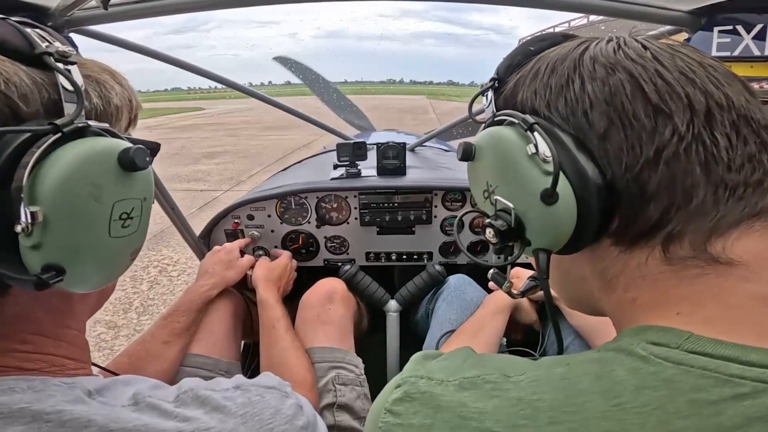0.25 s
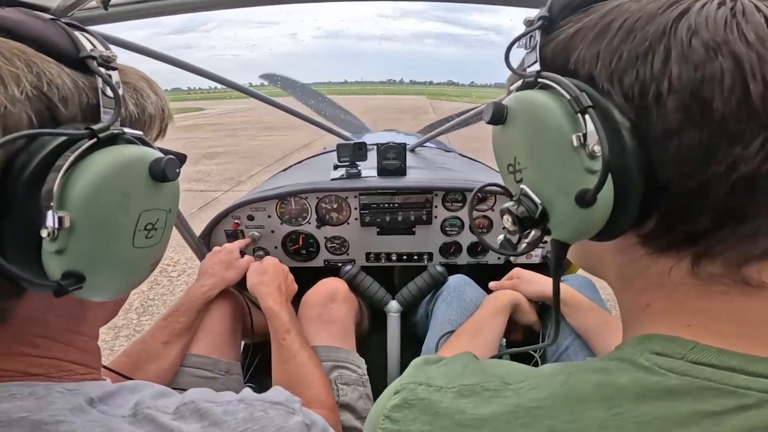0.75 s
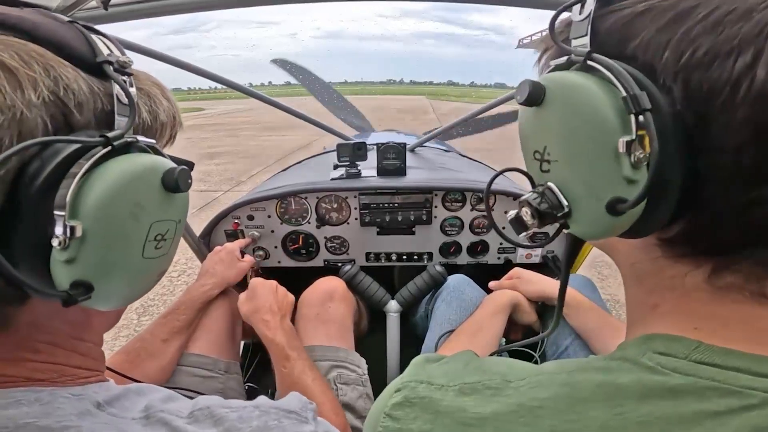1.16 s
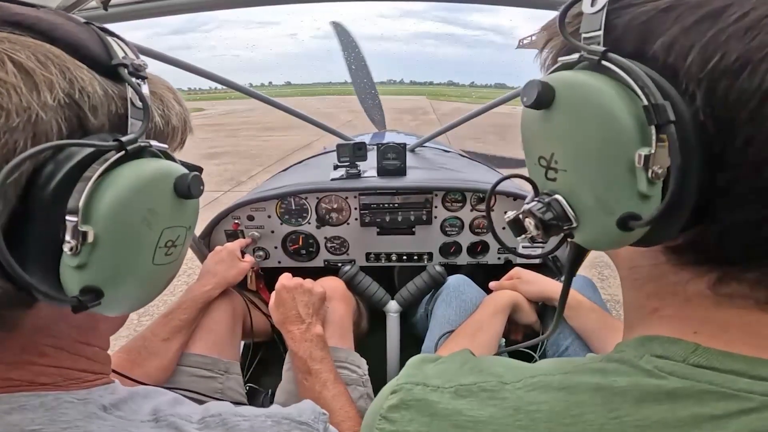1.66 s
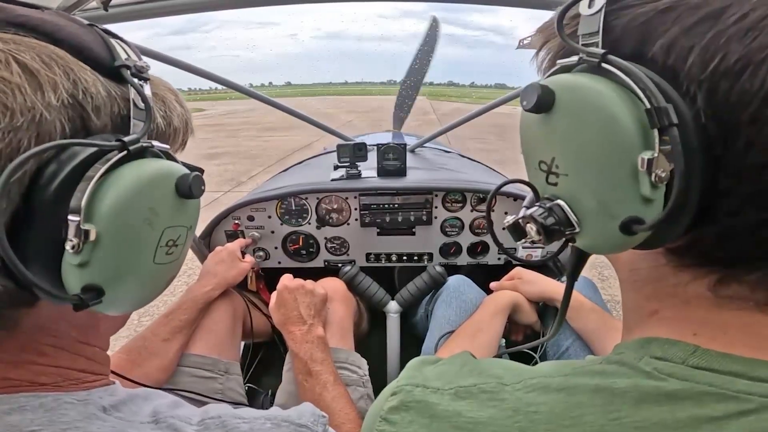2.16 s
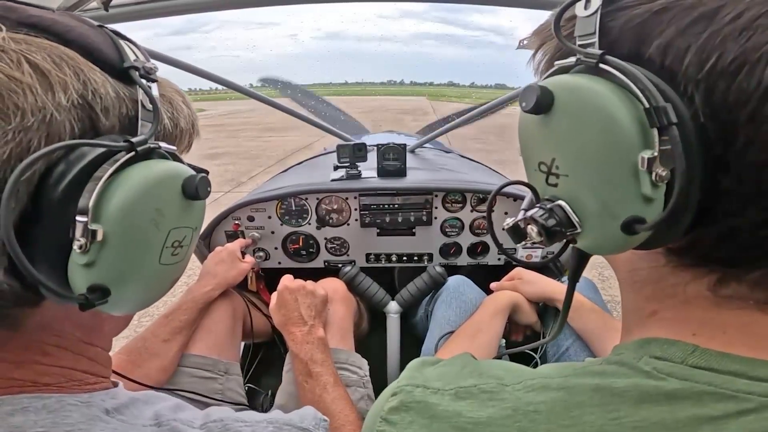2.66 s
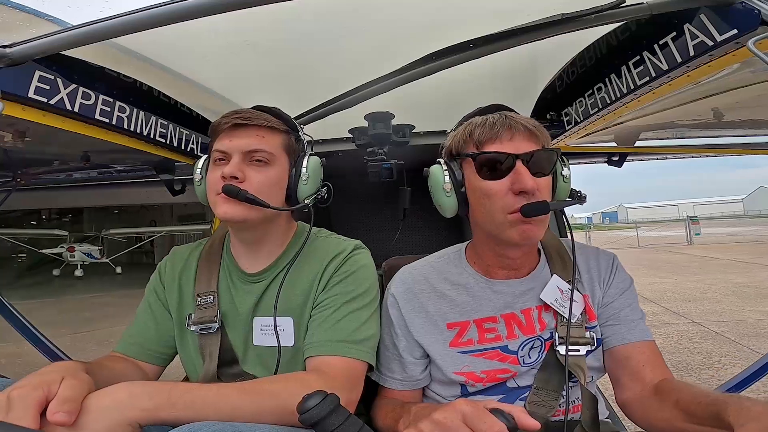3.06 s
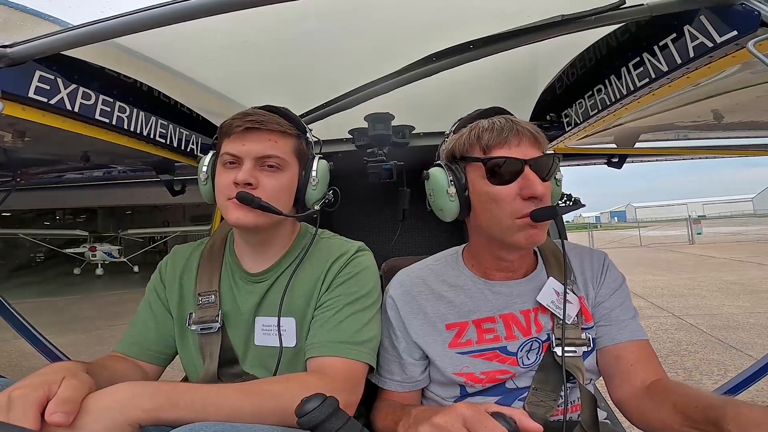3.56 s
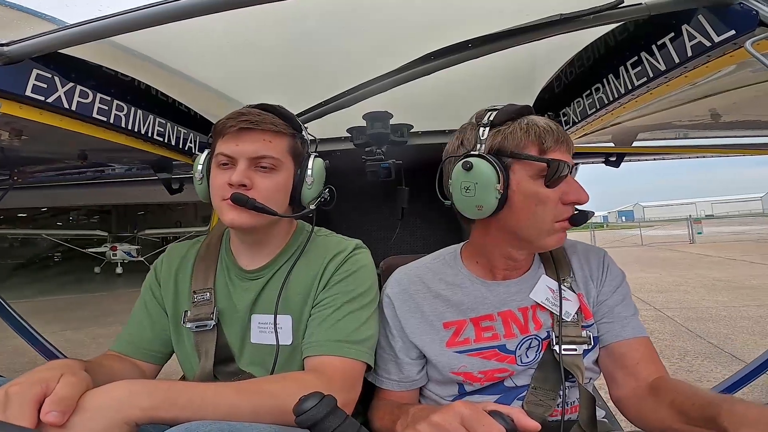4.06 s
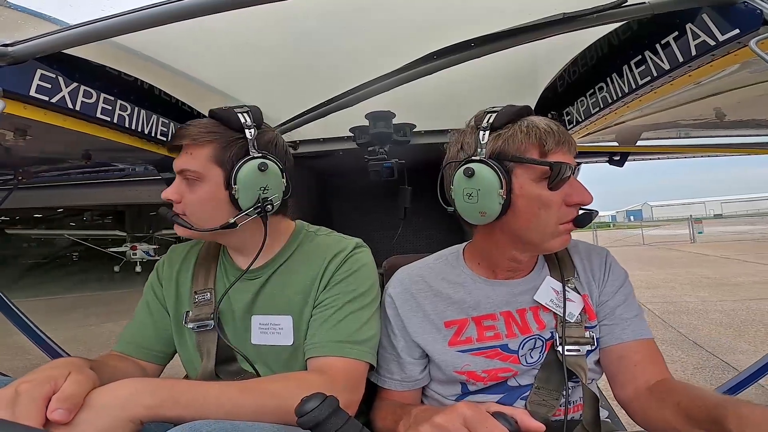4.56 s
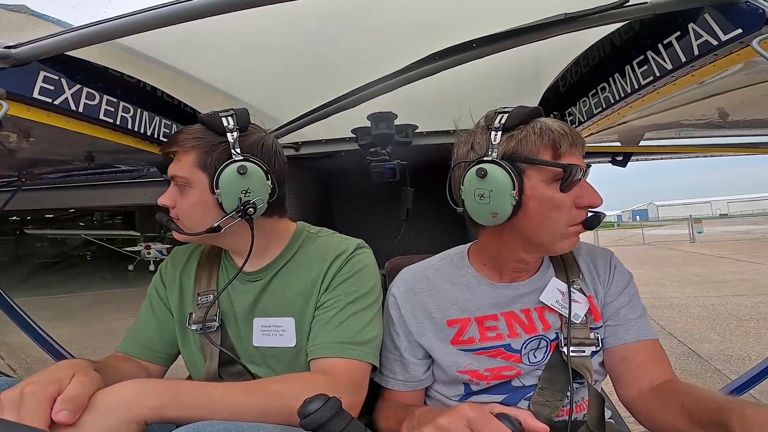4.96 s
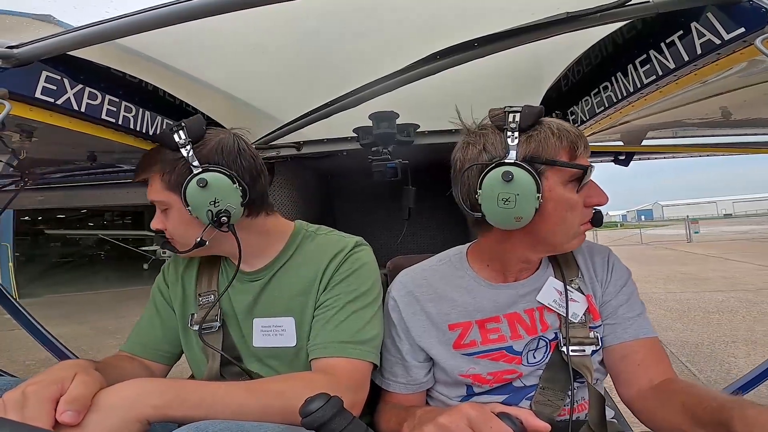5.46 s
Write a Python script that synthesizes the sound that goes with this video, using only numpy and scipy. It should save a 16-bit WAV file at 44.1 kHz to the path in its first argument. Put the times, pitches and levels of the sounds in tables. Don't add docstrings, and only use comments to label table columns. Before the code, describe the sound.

A small aircraft engine catches and speeds up with a loud rattling cabin roar, then cuts abruptly to a quieter, muffled, throbbing drone.

```python
import sys
import numpy as np
from scipy import signal
from scipy.fft import rfft, irfft, next_fast_len
from scipy.io import wavfile
from scipy.ndimage import uniform_filter1d, map_coordinates

SR = 44100
rng = np.random.default_rng(int(sys.argv[2]) if len(sys.argv) > 2 else 0)


def log_audio(samples):
    frames = np.atleast_2d(samples).T
    limited = np.clip(frames, -1, 1)
    pcm = np.round(limited * 32767).astype(np.int16)
    wavfile.write(sys.argv[1], SR, pcm)


def level_to_linear(level):
    exponent = np.asarray(level, float) / 20
    return 10 ** exponent


N = 251370
SWITCH_S = 2.82653
BLADE_ORDER = 3 / 2 / 2.43
LEFT_RIGHT = np.array([[1], [-1]])


def in_time(rows, t):
    s, *columns = np.transpose(rows)
    return [np.interp(t, s, column) for column in columns]


def at_hz(points, hz, axis=1):
    return np.interp(np.log(hz), np.log(np.array(points)[:, 0]), np.array(points)[:, axis])


def resonance(hz, centre, width, lift_db):
    return lift_db / (1 + (2 * (hz - centre) / width) ** 2)


def drift(t, per_s):
    knots = rng.standard_normal(400)
    return map_coordinates(knots, [(t - t[0]) * np.clip(per_s, .1, 130)], order=3)


def ring(clicks, hz, t60):
    r, w = level_to_linear(-60 / (t60 * SR)), 2 * np.pi * hz / SR
    return signal.lfilter([0, np.sin(w)], [1, -2 * r * np.cos(w), r * r], clicks + 1e-18)


def turns(hz):
    phase = 2 * np.pi * np.cumsum(hz) / SR
    return phase - phase[-1]


def to_sample(seconds, t):
    return (seconds * SR).astype(int).clip(0, len(t) - 1)


def engine_tones(t, firing, orders, levels_db, waver_db):
    out = 0
    for order, db in zip(orders, levels_db):
        out = out + np.sqrt(2) * level_to_linear(db + waver_db * drift(t, 14)) * np.cos(order * firing)
    return out


def upper_orders(t, firing, orders):
    return sum(level_to_linear(db + 4.5 * drift(t, 4.96)) * np.sin(k * firing + k * k) for k, db in orders)


# multiple of firing, level in dB away from cabin modes, change in dB per Hz of firing.
REAR_LINES = [(2 / 2, -28, 0.01), (2, -29, 0.088), (5 / 2, -35, -0.12), (3 / 4, -39, 1.2), (4, -45.5, 0.01),
              (5, -44.5, 0.01), (6, -45.5, 0.01), (13 / 2, -49, -0.27), (15 / 2, -44.5, 0.01),
              (2 / 4, -48, 0.8), (3, -47, -0.37)]
# Hz, width in Hz, lift in dB.
CABIN_MODES = [(49, 7.7, 7.5), (57.6, 4, -4), (86.8, 5.2, 3.5), (92.7, 2.8, -14), (112, 13, 4.5),
               (223, 13, 6), (273.3, 12, 9.5), (306.5, 20, 8.5)]
# multiple of firing, level in dB.
REAR_ORDERS = [(3 / 2, -34), (3.4, -37.5), (4, -43.5), (9 / 2, -36), (4.4, -48)]


def rear_tones(t, hz, firing):
    levels_db = []
    for order, db, slope in REAR_LINES:
        cabin_db = sum(resonance(order * hz, *mode) for mode in CABIN_MODES)
        levels_db.append(db + slope * (hz - hz.mean()) + cabin_db)
    steady = engine_tones(t, firing, [row[0] for row in REAR_LINES], levels_db, waver_db=1.14)
    return steady + upper_orders(t, firing, REAR_ORDERS)


# time in seconds, level in dB.
CATCH = [
    (0, -39),
    (.06, -26),
    (.22, -30.5),
    (.3, -68),
]


def catch_boom(t):
    return level_to_linear(in_time(CATCH, t)[0] + 6) * np.sin(2 * np.pi * 131.5 * t) * (t < CATCH[-1][0])


# multiple of firing, level in dB.
PANEL_ORDERS = [(3 / 2, -52.5), (1.8, -42.5), (5 / 2, -47), (4.3, -47.5), (7 / 2, -41.5), (2.9, -47.5),
                (5.9, -49.5), (6, -47.5)]


def panel_tones(t, firing, firing_db, faster):
    levels_db = [firing_db, -59.5 + 1 * faster, -44.5]
    tones = engine_tones(t, firing, [1, BLADE_ORDER, 4 * BLADE_ORDER], levels_db, waver_db=2.1)
    mount = level_to_linear(-54 - 1 * faster) * np.sin(firing) * LEFT_RIGHT
    return tones + upper_orders(t, firing, PANEL_ORDERS) + mount


def pops(t, rows, gain_db, cycles):
    out = np.zeros(len(t))
    age = np.arange(int(.1 * SR)) / SR
    for s, db, hz in rows:
        at = int((s - t[0]) * SR)
        height = level_to_linear(db + gain_db - 60 * age * hz / cycles)
        soft_start = 1 - np.exp(-age * hz * 1.9)
        wave = height * np.sin(2 * np.pi * hz * age) * soft_start
        out[at:at + len(age)] += wave[:len(t) - at]
    return out


SLAP_HZ = [122, 487]


def blade_slaps(blade):
    passes = np.flatnonzero(np.diff(np.floor(blade / (2 * np.pi))))
    chance = rng.standard_normal((200, 2))[:len(passes)]
    at = (passes + .0012 * SR * chance[:, 0]).astype(int).clip(0, len(blade) - 1)
    pushes = np.zeros(len(blade))
    pushes[at] = level_to_linear(-13.5 + 2 * chance[:, 1])
    band = signal.butter(2, SLAP_HZ, "band", fs=SR, output="sos")
    return signal.sosfilt(band, pushes) * SR / (2 * np.pi * SLAP_HZ[1])


# start in seconds, peak in dB, pitch in Hz.
KNOCKS = [(2.861, -28, 1080), (3.085, -21.5, 1080), (3.123, -22, 950), (3.183, -24, 1190),
          (3.451, -25, 1070), (3.499, -25.5, 1080), (4.022, -37, 1080), (4.540, -19, 644),
          (4.542, -30, 1110), (5.572, -31, 1000), (4.628, -24, 900), (4.698, -20, 1090), (4.718, -25, 1190),
          (4.83, -21, 600), (4.855, -27, 1150), (5.037, -26.5, 1120), (5.370, -23, 630), (5.415, -24, 1120),
          (5.640, -21.5, 650)]
# start in seconds, peak in dB, pitch in Hz.
PANEL_TAPS = [(2.941, -19, 635), (3.04, -20, 646), (3.225, -27, 888), (3.306, -22, 1060), (3.351, -22, 665),
              (3.371, -23, 622), (3.403, -21, 767), (3.472, -25, 1160), (3.602, -31, 600),
              (3.706, -24, 673), (3.764, -30, 1200), (3.865, -29, 662), (3.892, -33, 620),
              (4.234, -28, 665), (4.478, -33, 778), (4.519, -32, 1080), (4.677, -22, 764), (4.74, -35, 746),
              (4.975, -24, 705), (5.086, -28, 640), (5.189, -26, 630), (5.392, -22, 626), (5.528, -24, 760),
              (5.617, -30, 630)]


def airframe_knocks(t):
    out = np.zeros(len(t))
    for s, db, hz in [*KNOCKS, *[(s, db - 2, hz) for s, db, hz in PANEL_TAPS]]:
        click = level_to_linear(db - 4.0) * (np.arange(len(t)) == int((s - t[0]) * SR))
        out += ring(click, hz, 0.031)
        out += 0.6 * ring(click, 1.6 * hz, 0.011)
        out += 0.081 * ring(click, 2.2 * hz, 0.0071)
    return out


CRACK_HZ = [1900, 13370]


def crack(clicks):
    burst = rng.standard_normal(400) * np.exp(-np.arange(400) / SR / 0.0014)
    snaps = signal.fftconvolve(clicks, burst[None], axes=1)[:, :clicks.shape[1]]
    band = signal.butter(4, CRACK_HZ, "band", fs=SR, output="sos")
    return level_to_linear(3.5) * signal.sosfilt(band, snaps)


# start in seconds, peak in dB, centre in Hz.
LATCH_RATTLES = [(0.0198, -22, 2110), (0.037, -18, 2160), (0.0674, -16.5, 2100), (0.091, -17.5, 2160),
                 (0.111, -25, 2300), (.134, -25, 2920), (.162, -16.5, 2120), (0.1868, -21, 2160),
                 (.261, -30, 2890), (.3222, -35, 2510), (0.342, -21.5, 2070), (0.3887, -22, 2900),
                 (.427, -25, 2170), (0.449, -26.5, 2110), (0.489, -24.5, 2110), (0.5163, -25, 2830),
                 (0.539, -27, 2100), (0.5692, -24.5, 2070), (0.646, -27, 2120), (0.6717, -22.5, 2140),
                 (0.693, -24, 2610), (0.7427, -22, 2560), (0.7864, -20.5, 2630), (0.8293, -30, 2230),
                 (0.8587, -22.5, 2500), (.9244, -30, 2940), (0.9685, -25.5, 2090), (2.138, -20, 2100),
                 (2.4055, -23, 2170), (2.677, -21, 2690)]
# start in seconds, peak in dB, centre in Hz.
AHEAD_RATTLES = [(.0003, -11.5, 4550), (0.0212, -13, 4460), (0.083, -31, 3830), (0.174, -19, 3150),
                 (0.756, -24, 4500), (1.057, -23.5, 3170), (1.148, -28, 3240), (1.2354, -23, 3060),
                 (1.385, -21.5, 2110), (1.4136, -20.5, 2260), (1.503, -26, 3130), (1.5464, -27, 2160),
                 (1.6117, -30, 2280), (1.677, -19, 2120), (1.7617, -21, 4940), (1.782, -19.5, 2080),
                 (1.94, -20, 2080), (2.0522, -24, 2170), (2.0962, -19.5, 4000), (2.177, -23.5, 3780),
                 (2.2097, -22, 3030), (2.256, -21, 3890), (2.3124, -25, 3110), (2.334, -21.5, 4000),
                 (2.3524, -17, 2110), (2.392, -24, 3130), (2.43, -23, 4070), (2.483, -26, 3130),
                 (2.556, -26, 4550), (2.61, -34, 3130), (2.6265, -23, 3930)]
# start in seconds, peak in dB, centre in Hz.
FAINT_RATTLES = [(0.052, -22, 2150), (0.101, -22, 2150), (0.123, -25, 2150), (0.146, -31, 3900),
                 (0.2204, -32, 2100), (0.3564, -23, 2000), (0.433, -31, 2090), (0.4714, -32, 2200),
                 (0.5014, -30.5, 2170), (0.547, -29, 2860), (0.6014, -27, 2110), (0.6325, -29, 2140),
                 (0.7166, -27, 2650), (0.7616, -26, 2140), (0.7964, -27, 2200), (0.8714, -22, 2060),
                 (0.9824, -30, 2090), (1.1223, -40, 3140), (1.479, -31, 2080), (1.656, -31, 3110),
                 (1.8097, -28, 2660), (1.8694, -37, 2120), (1.9915, -35, 2060), (2.193, -26, 3900),
                 (2.417, -28, 3900), (2.568, -34, 3900), (2.0672, -29, 2600), (2.113, -25, 2150),
                 (2.271, -24.5, 2130), (2.376, -39, 2090), (2.4464, -27.5, 2110), (2.525, -32.5, 3100),
                 (2.581, -26, 2660), (2.698, -27, 2160), (0.306, -40, 2090), (0.4976, -31, 2900),
                 (1.299, -32, 2100), (2.7235, -23, 2110), (2.7747, -27, 3870)]
# Hz, level in dB, seconds to fall by 60 dB.
FITTINGS = [(2160, -6.5, 0.024), (2500, -14.5, 0.034), (2560, -21, 0.15), (2800, -3, 0.013),
            (3110, -2.5, 0.0075), (3430, -2.5, 0.0074), (3930, -3, 0.016), (4460, -7.5, 0.023),
            (4830, -10, 0.029), (5500, -8, 0.0075), (6200, -12.5, 0.017), (6720, -8.5, 0.0066),
            (6880, -17, 0.014), (7640, -10.5, 0.017), (8260, -18, 0.014)]
# Hz, left minus right in dB.
FITTING_LEAN = [(2100, 5.5), (2900, 4), (3900, -0.5), (4500, 3), (5600, -12), (6800, -1), (7600, -4),
                (8300, 2)]


def rattles(t, cycle, shake_db):
    # left minus right in dB, brightness of the upper modes in dB
    rows = [(*row, 13, -12) for row in LATCH_RATTLES]
    rows += [(*row, 0.5, -15) for row in AHEAD_RATTLES]
    rows += [(s, db + 2.5, hz, 4, -16.5) for s, db, hz in FAINT_RATTLES]
    start, peak_db, centre, pan_db, bright_db = np.array(rows).T
    chance = rng.standard_normal((len(rows), len(FITTINGS) + 1, 8, 3))

    gaps = np.abs(chance[:, -1, :, 0]) * 0.0028 * (np.arange(8) > 0)
    late = np.cumsum(gaps, axis=1)
    at = to_sample(start[:, None] + late, t)
    fading = level_to_linear(-650 * late + 2 * (late == 0))

    crowd = 220 * np.exp(1.4 * np.cos(cycle) + 0.57 * np.cos(4 * cycle) + 0.57 * drift(t, 13))
    small_db = 3.1 * np.minimum(rng.exponential(1, len(t)), 3.5) + shake_db - 5.0
    small = (rng.random(len(t)) < crowd / SR) * level_to_linear(small_db)

    out = np.zeros((2, len(t)))
    for k, (hz, level_db, t60) in enumerate(FITTINGS):
        alike = .85 if hz < 5200 else .1
        apart = np.sqrt(1 - alike ** 2)
        shared, left, right = rng.standard_normal((3, len(t)))
        clicks = small * (alike * shared + apart * np.array([left, right]))
        near_db = -10 * np.abs(np.log2(hz / centre)) if hz < 5200 else bright_db + 6
        common = (np.sign(chance[:, k, :, 2]) + 0.25 * chance[:, k, :, 2]) * 0.7
        for channel, sign in enumerate([1, -1]):
            size = level_to_linear(peak_db + near_db + sign * pan_db / 2 - 11.0)[:, None] * fading
            np.add.at(clicks[channel], at, size * (alike * common + apart * chance[:, k, :, channel]))
        lean = at_hz(FITTING_LEAN, hz) / 2 * LEFT_RIGHT
        out += level_to_linear(level_db + lean) * ring(clicks, hz, t60)
    clicks[:, at[:, 0]] += level_to_linear(peak_db - 19 + pan_db / 2 * LEFT_RIGHT)
    return out + level_to_linear(-21.5) * crack(clicks)


# start in seconds, peak in dB.
BUZZES = [(0.0385, -33), (0.0777, -35), (0.175, -37), (0.2204, -50), (0.2613, -44), (0.2872, -49),
          (0.3222, -50), (0.3416, -39), (0.3815, -48), (0.394, -47.5), (0.4274, -45.5), (0.4718, -53),
          (0.5212, -41), (0.634, -50), (0.6729, -48), (0.6913, -40), (0.7552, -36), (0.7861, -46),
          (0.8425, -52), (0.8584, -50), (0.9118, -49), (0.9273, -46), (0.9695, -39), (1.0126, -55),
          (1.1568, -59), (1.385, -42), (1.4152, -48), (1.4855, -57), (1.505, -52), (1.5943, -50),
          (1.6392, -55), (1.6766, -53), (1.7235, -54), (1.7674, -50), (1.8093, -51), (1.8522, -49),
          (2.0527, -52), (2.0647, -51), (2.1026, -47), (2.1405, -49), (2.1844, -50), (2.209, -36),
          (2.2628, -46), (2.3126, -44), (2.3516, -48), (2.3925, -53), (2.4947, -58), (2.6784, -40),
          (2.7222, -47), (2.7741, -47)]
BUZZ_HZ = [6600, 6980]


def buzzes(t):
    rows, out = np.array(BUZZES), 0
    chance = rng.standard_normal((len(rows), 3, 4))
    late = np.cumsum(np.abs(chance[:, 2]) * 0.0022, axis=1)
    at = to_sample(rows[:, :1] + late - .001, t)
    for k, hz in enumerate(BUZZ_HZ):
        clicks = np.zeros(len(t))
        np.add.at(clicks, at, level_to_linear(rows[:, 1:] - 3) * np.sign(chance[:, k]))
        out = out + ring(clicks, hz, t60=0.017)
    return out * level_to_linear(6.5 / 2 * LEFT_RIGHT) * LEFT_RIGHT


def half_octave(hz, centre):
    return np.cos(np.pi * np.clip(np.log2(hz / centre), -.5, .5)) ** 2


ROAR_CENTRES_HZ = [150, 350, 1050, 4000]


def roar(t, levels_db, colour, peaks, likeness, throb, beats, patchy_db):
    size = next_fast_len(len(t))
    hz = np.maximum(np.arange(size // 2 + 1) * SR / size, 1)
    shape_db = at_hz(colour, hz) + sum(resonance(hz, *peak) for peak in peaks)
    mid, side = rfft(rng.standard_normal((2, size))) * level_to_linear(shape_db) * (hz > 12)
    alike = np.clip(at_hz(likeness, hz), -.99, 1)
    pair = np.sqrt(1 + alike) * mid + np.sqrt(1 - alike) * side * LEFT_RIGHT

    boom = (hz > 200) & (hz < 600)
    pair = pair / np.std(irfft(pair[0] * boom, size))
    swing_db = np.array([db - np.mean(db) for db in levels_db]) + np.mean(levels_db[1])

    out, gust = 0, drift(t, 26.01)
    for centre in 10 * 2 ** np.arange(0, 11, .5):
        place = np.interp(np.log(centre), np.log(ROAR_CENTRES_HZ), range(4))
        below = min(int(place), 2)
        level_db = swing_db[below] + (place - below) * (swing_db[below + 1] - swing_db[below])
        pump = sum(at_hz(throb, centre, axis=k + 1) * np.cos(beat) for k, beat in enumerate(beats))
        gust_share = min(centre / 2200, 1.9)
        patches_db = patchy_db * (gust_share * gust + 0.61 * drift(t, 29.84))
        band = irfft(pair * half_octave(hz, centre), size)[:, :len(t)]
        out = out + level_to_linear(level_db + patches_db) * np.exp(pump) * band
    return out


# level in dB, dB per dB of shaking, dB of starting surge, dB per Hz of firing.
REAR_LAW = [(-27, 0.15, 4.5, 0.13), (-28.5, 0.21, 5.5, 0), (-38, 0.8, -4.5, 0.19), (-51, 1.16, 1.4, 0.4654)]
# Hz, level in dB per Hz.
REAR_COLOUR = [(18, -11.5), (48, -6.5), (101, -4), (178, -9), (313, -10.5), (371, -15.5), (600, -19),
               (819, -25), (1290, -28), (3180, -40), (7640, -49.5), (9000, -56), (12800, -64.5),
               (15500, -71.5)]
# Hz, width in Hz, lift in dB.
REAR_PEAKS = [(139.7, 21, 3), (209, 23, 1.5), (256, 18, 4), (315, 12, 3.5), (470, 36, 7), (1090, 260, 4.5),
              (4640, 870, 1.5)]
# Hz, likeness from -1 to 1.
REAR_LIKENESS = [(60, 0.97), (130, 1.0), (290, 0.99), (640, 0.95), (1410, 0.9), (3100, 0.57), (6820, -0.64),
                 (15000, 0.19)]
# Hz, depth by firing, by blade, by full four-stroke cycle.
REAR_THROB = [(101, 0.017, 0.056, 0.03), (980, 0.078, 0.073, 0.032), (4940, 0.037, 0.062, 0.069)]


def rear_air(t, hz, shake_db, beats):
    surge = 1 / (1 + (t / 0.67) ** 5.5)
    shaking, faster = shake_db - shake_db.mean(), hz - hz.mean()
    levels_db = [db + a * shaking + b * surge + c * faster for db, a, b, c in REAR_LAW]
    return roar(t, levels_db, REAR_COLOUR, REAR_PEAKS, REAR_LIKENESS, REAR_THROB, beats, patchy_db=1.5)


# level in dB, dB per Hz of firing.
PANEL_LAW = [(-33, 0.2), (-31.5, 0.25), (-47, 0.15), (-60, 0.33)]
# Hz, level in dB per Hz.
PANEL_COLOUR = [(18, -22), (40, -23), (65, -11), (110, -5.5), (200, 2), (300, -3.5), (450, -7), (650, -15),
                (1200, -17), (2000, -25), (2700, -37), (4500, -42), (5800, -55), (9000, -76)]
# Hz, width in Hz, lift in dB.
PANEL_PEAKS = [(260, 16, 5), (309.4, 33, 5), (642, 9.2, 13), (930, 54, 3.5), (1080, 65, 5.5),
               (1550, 180, 4), (3110, 240, 13), (3830, 100, 9.5), (4020, 110, 6.5), (4575, 330, 10),
               (5080, 250, 5)]
# Hz, likeness from -1 to 1.
PANEL_LIKENESS = [(30, 0.64), (70, 1), (140, 1), (15000, 1)]
# Hz, depth by crank, by blade, by twice the blade rate.
PANEL_THROB = [(100, 0.054, 0.37, 0.03), (400, 0.045, 0.23, 0.081), (2500, 0.095, 0.11, 0.14)]


def panel_air(t, faster, beats):
    levels_db = [db + slope * faster for db, slope in PANEL_LAW]
    return roar(t, levels_db, PANEL_COLOUR, PANEL_PEAKS, PANEL_LIKENESS, PANEL_THROB, beats, patchy_db=0.7)


# Hz, left minus right in dB.
REAR_BALANCE = [(60, 0.5), (110, 0), (200, 0), (380, 0.5), (700, 0.5), (1290, 3), (2380, 2), (4400, 1),
                (8120, -2), (15000, 2)]
# Hz, phase in radians.
REAR_LEAD = [(60, 0), (400, -0.028), (1000, -0.32), (1810, -0.62), (2670, -1.66), (3880, 0.92),
             (5680, -0.75), (15000, -1.0)]


def two_ports(sound, t):
    hz = np.maximum(np.arange(len(t) // 2 + 1) * SR / len(t), 1)
    balance = level_to_linear(at_hz(REAR_BALANCE, hz) / 2 * LEFT_RIGHT)
    lead = np.exp(.5j * at_hz(REAR_LEAD, hz) * LEFT_RIGHT)
    return irfft(rfft(sound) * balance * lead, len(t))


# low edge in Hz, high edge in Hz, rarity (higher is more often off).
RAGGED = [(9000, 9250, -1.3), (9400, 9650, -1.2), (9950, 10200, -1.0), (10400, 10650, -.8),
          (10850, 11100, -.7), (11450, 11700, -.7), (11800, 12050, -.7), (12350, 12600, -.6),
          (12900, 13400, -.2), (13400, 14000, .1), (14000, 14700, .4), (14700, 16500, 1.0)]


def ragged_top(sound, t):
    hz, spectrum = np.arange(len(t) // 2 + 1) * SR / len(t), rfft(sound)
    frame_s = 1024 / 48000
    t = t // frame_s * frame_s
    together = drift(t, 22.0)
    for low_hz, high_hz, rarity in RAGGED:
        off = .55 * together + .85 * drift(t, 32.0) < rarity
        lost = uniform_filter1d(1.0 * off, size=200)
        sound = sound - lost * irfft(spectrum * ((hz >= low_hz) & (hz < high_hz)), len(t))
    return sound


# time in seconds, firing rate in Hz, shaking of the airframe in dB.
REAR_ENGINE = [(0.0, 30.9, -35.5), (.07, 33.05, -41), (.18, 34.12, -45.5), (.27, 36.64, -52),
               (.35, 37.93, -50.5), (.54, 41.14, -50), (.62, 41.26, -53), (.72, 41.88, -50.5),
               (1.15, 44.07, -51), (1.52, 44.41, -52), (1.67, 46.11, -49.5), (1.97, 47.55, -49.5),
               (2.22, 50.6, -50.5), (2.46, 54.18, -51.5), (2.69, 56.26, -51.5), (2.82, 58.17, -52)]
# start in seconds, peak in dB, pitch in Hz.
REAR_POPS = [(0.102, -11, 169), (0.305, -9, 227), (0.345, -4.5, 176), (0.474, -8, 224), (0.537, -13, 179),
             (0.645, -4.5, 280), (0.685, -14, 208), (0.765, -19, 305), (1.144, -19, 174), (1.59, -10, 254),
             (1.808, -7, 271), (2.116, -9, 224), (2.153, -18, 252), (2.196, -23, 310), (2.585, -22, 185),
             (2.642, -10, 226), (2.704, -9, 173), (2.761, -12, 206)]


def behind_seats(t):
    hz, shake_db = in_time(REAR_ENGINE, t)
    firing = turns(hz)
    cycle = firing / 4 + 1.6
    sound = rear_tones(t, hz, firing) + catch_boom(t)
    sound = sound + pops(t, REAR_POPS, gain_db=-4.5, cycles=13.6)
    sound = sound + rattles(t, cycle, shake_db) + buzzes(t)
    sound = sound + rear_air(t, hz, shake_db, [firing, BLADE_ORDER * firing, cycle])
    top_cut = signal.butter(4, 15500, fs=SR, output="sos")
    return ragged_top(two_ports(signal.sosfilt(top_cut, sound), t), t)


# time in seconds, firing rate in Hz, level of the firing tone in dB.
PANEL_ENGINE = [(2.83, 81.86, -42), (3.1, 79.84, -39), (3.5, 78.18, -40.5), (3.75, 76.63, -37.5),
                (4.2, 74.9, -44.5), (4.5, 73.2, -46.5), (4.85, 72.77, -52), (5.1, 72.13, -42.5),
                (5.7, 71.57, -41)]
# start in seconds, peak in dB, pitch in Hz.
PANEL_POPS = [(2.895, -10.5, 202), (2.937, -10.5, 248), (2.977, -23, 298), (3.061, -24.5, 199),
              (3.117, -24, 161), (3.223, -29, 160), (3.222, -9.5, 254), (3.285, -13, 200),
              (3.335, -12.5, 256), (3.407, -26, 199), (3.485, -10.5, 245), (3.537, -11.5, 231),
              (3.575, -9, 272), (3.607, -18, 174), (3.761, -12.5, 191), (3.799, -14, 185), (3.91, -22, 266),
              (3.949, -13.5, 298), (3.995, -20, 163), (4.09, -10.5, 256), (4.284, -19, 250),
              (4.326, -14, 170), (4.375, -25, 256), (4.477, -15, 240), (4.505, -15, 173), (4.632, -13, 240),
              (4.714, -11, 248), (4.759, -17, 191), (4.824, -20.5, 248), (4.853, -13, 248),
              (4.95, -25, 234), (4.977, -27, 210), (5.004, -19, 278), (5.045, -18, 269),
              (5.102, -17.5, 180), (5.144, -24, 203), (5.18, -30, 288), (5.246, -23, 227),
              (5.273, -16, 285), (5.387, -16.5, 170), (5.448, -21, 159), (5.467, -25, 207),
              (5.564, -26, 204), (5.635, -26, 230), (5.659, -20, 196)]


def on_panel(t):
    hz, firing_db = in_time(PANEL_ENGINE, t)
    firing, faster = turns(hz), hz - hz.mean()
    blade = BLADE_ORDER * firing
    sound = panel_tones(t, firing, firing_db, faster)
    sound = sound + pops(t, PANEL_POPS, gain_db=-2.5, cycles=14.5)
    housing = signal.butter(6, 3200, fs=SR, output="sos")
    sound = sound + signal.sosfilt(housing, blade_slaps(blade + 4.3) + airframe_knocks(t))
    return sound + panel_air(t, faster, [firing / 2, blade, 2 * blade])


def scene():
    t, switch = np.arange(N) / SR, int(SWITCH_S * SR) // 2 * 2
    rear = behind_seats(t[:switch])
    crest = np.exp((t[:switch] - t[switch - 1]) / .002)
    rear = rear + (.18 - rear[:, -1:]) * crest
    fade_in = np.clip((t[switch:] - SWITCH_S) / 0.0018, 0, 1)
    out = np.hstack([rear, on_panel(t[switch:]) * fade_in])
    out[:, switch - 1] = (out[:, switch - 2] + out[:, switch]) / 2
    tick = int(2.832 * SR)
    out[:, tick:tick + 2] += level_to_linear(-38.5) * np.array([1, -1])
    return out * np.clip((t[-1] - t) / .002, 0, 1)


def roll_off(x):
    return signal.sosfilt(signal.butter(12, 15710, fs=SR, output="sos"), x)


def record(dry):
    soften = signal.butter(1, 13000, fs=SR, output="sos")
    hiss = signal.sosfilt(soften, rng.standard_normal(dry.shape))
    hiss = hiss * (np.arange(N) > SWITCH_S * SR)
    return roll_off(dry + level_to_linear(-71.5) * hiss)


dry = scene()
out = record(dry)
log_audio(out)
```